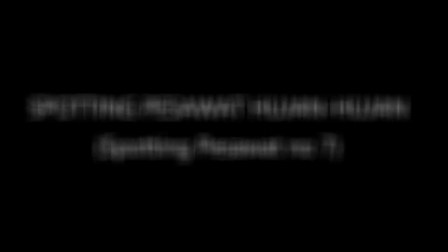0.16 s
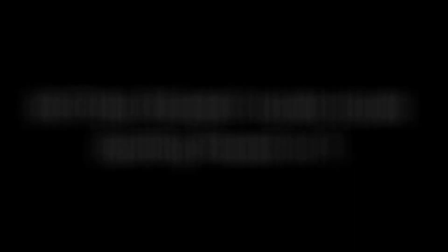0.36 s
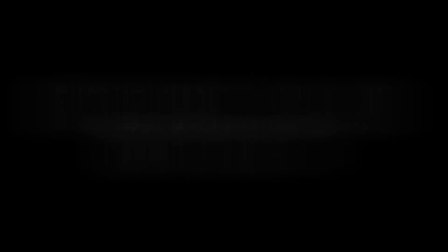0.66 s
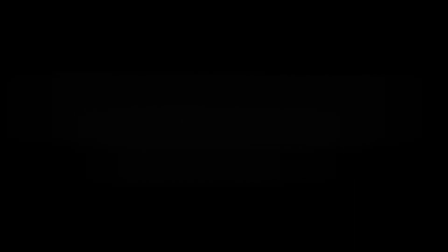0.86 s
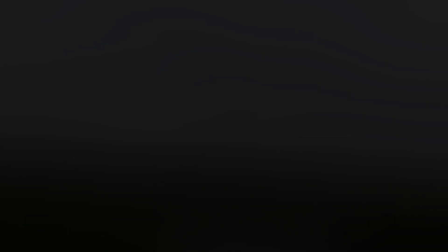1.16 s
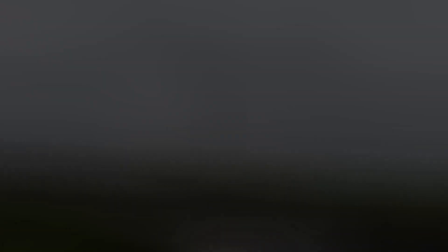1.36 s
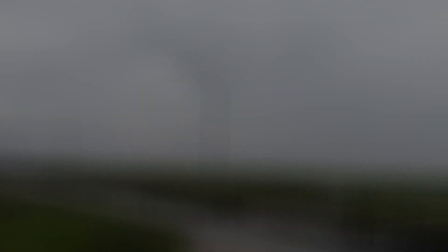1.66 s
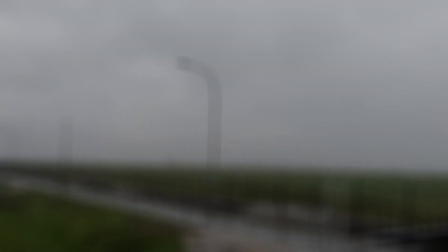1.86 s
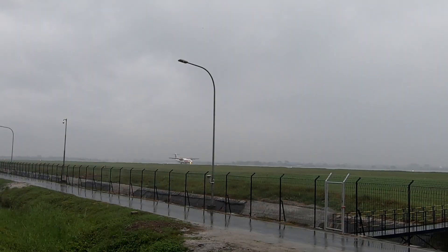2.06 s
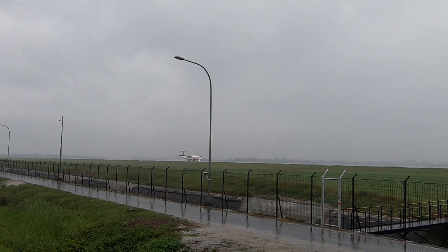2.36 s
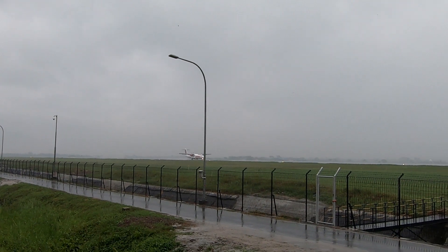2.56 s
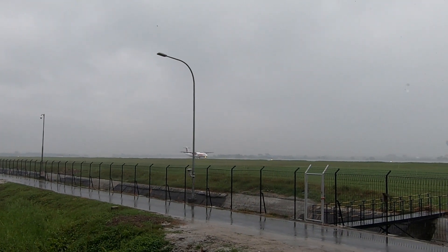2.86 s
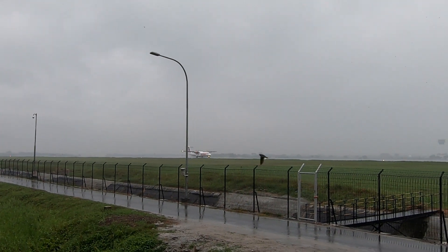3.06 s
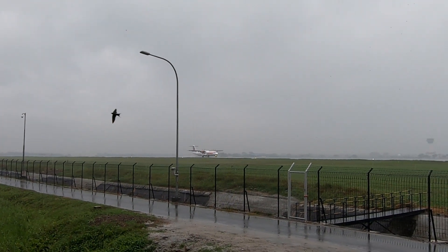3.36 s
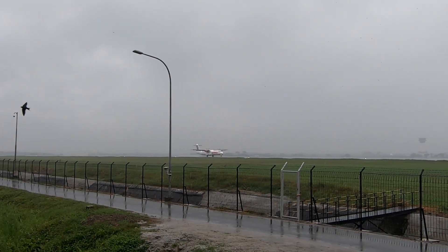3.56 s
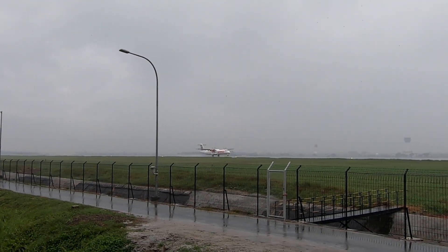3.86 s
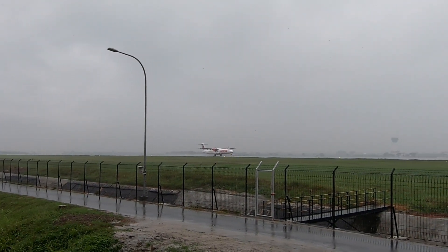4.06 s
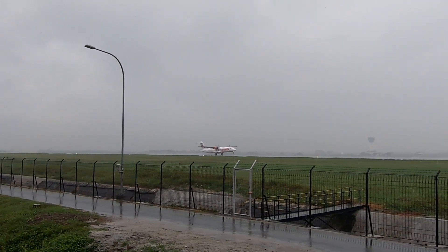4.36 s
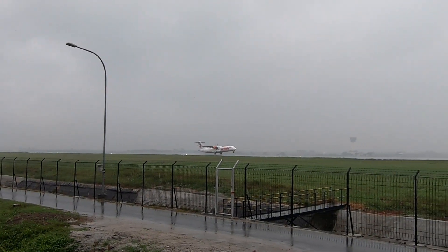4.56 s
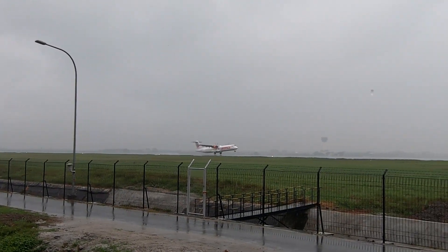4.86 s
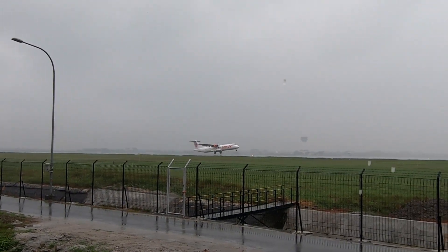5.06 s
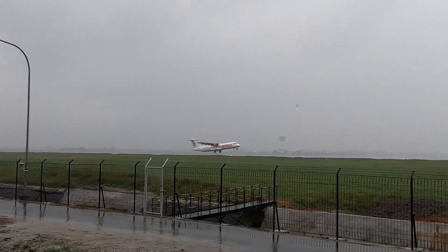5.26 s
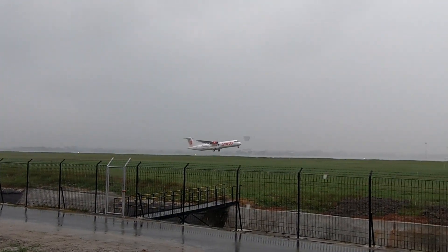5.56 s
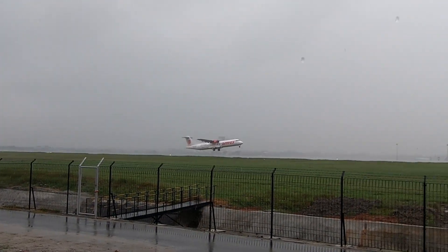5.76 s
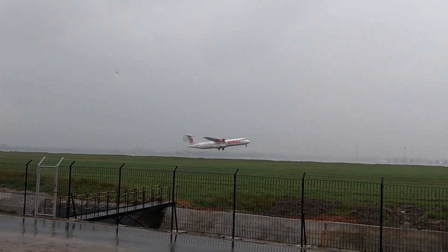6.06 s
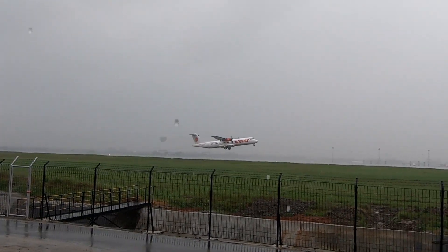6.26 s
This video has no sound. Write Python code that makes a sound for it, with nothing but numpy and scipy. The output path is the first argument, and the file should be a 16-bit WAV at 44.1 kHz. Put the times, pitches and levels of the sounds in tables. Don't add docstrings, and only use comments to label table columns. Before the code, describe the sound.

On a wet, windy airfield, a twin turboprop's low propeller drone swells unevenly, then jet roar, hiss and whine break open as it nears.

```python
import sys
import numpy as np
from scipy import signal
from scipy.fft import rfft, irfft, next_fast_len
from scipy.io import wavfile

SR = 44100
rng = np.random.default_rng(int(sys.argv[2]) if len(sys.argv) > 2 else 0)


def store_pcm(level_fs):
    pcm = np.round(np.clip(level_fs, -1, 1) * 32767).astype(np.int16)
    wavfile.write(sys.argv[1], SR, np.atleast_2d(pcm).T)


def gain_from_db(level_db):
    decades = np.asarray(level_db, float) / 20
    return 10 ** decades


N = 282681
SPEED_M_S, ABEAM_S, OFFSET_M = 58., 7.5, 60.


def rms_one(x):
    return x / np.sqrt(np.mean(x ** 2) + 1e-20)


def in_time(rows):
    s, *columns = np.transpose(rows)
    return [np.interp(np.arange(N) / SR, s, c) for c in columns]


def at_hz(points, hz):
    table_hz, table_db = np.array(points)[:, 0], np.array(points)[:, 1]
    return np.interp(np.log(hz), np.log(table_hz + 1), table_db)


def bumps(rows, width=0.037):
    t = np.arange(N) / SR
    return sum(db * np.exp(-((t - s) / width) ** 2) for s, db in rows)


def swell(start, length, edge):
    u = (np.arange(N) / SR - start) / length
    return np.sin(np.pi / 2 * np.clip(np.minimum(u, 1 - u) / edge, 0, 1)) ** 2


def drift(rate):
    r = np.exp(-80 * np.pi * rate / SR)
    steps = rng.standard_normal(N // 40 + 2002)
    slow = signal.lfilter([1], [1, -2 * r, r * r], steps)[2000:]
    return np.interp(np.arange(N) / 40, np.arange(len(slow)), rms_one(slow))


def shape(x, gain_at):
    size = next_fast_len(N)
    hz = np.arange(1, size // 2 + 2) * SR / size
    return irfft(rfft(x, size) * gain_at(hz), size)[:N]


def high_or_low(x, kind, hz):
    return signal.sosfilt(signal.butter(2, hz, kind, fs=SR, output="sos"), x)


def patchy_noise(spectrum, slow_db, fast_db):
    size = next_fast_len(N)
    hz = np.arange(1, size // 2 + 2) * SR / size
    colour, octaves = gain_from_db(at_hz(spectrum, hz)), np.log2(hz)
    together_db = slow_db * (drift(2.9) + 0.75 * drift(15.0))
    lowest, highest = np.log2(spectrum[0][0]), np.log2(spectrum[-1][0])
    out = 0
    for centre in np.arange(lowest + .5, highest, .5):
        inside = np.flatnonzero(abs(octaves - centre) < .5)
        window = np.cos(np.pi * (octaves[inside] - centre))
        bins = np.zeros(len(hz), complex)
        bins[inside] = [1, 1j] @ rng.standard_normal((2, len(inside))) * window * colour[inside]
        out = out + irfft(bins, size)[:N] * gain_from_db(together_db + fast_db * drift(23.0))
    return rms_one(out)


def tone(hz, wander_hz, flutter_db):
    phase = 2 * np.pi * np.cumsum(hz + wander_hz * drift(10.2)) / SR
    return np.sqrt(2) * np.sin(phase) * gain_from_db(flutter_db * drift(7.2))


def narrow(hz, width_hz):
    a, b = high_or_low(rng.standard_normal((2, N)), "low", width_hz / 2)
    phase = 2 * np.pi * np.cumsum(hz) / SR
    return rms_one(a * np.cos(phase) + b * np.sin(phase))


def ring(clicks, hz, t60):
    r, w = gain_from_db(-60 / (t60 * SR)), 2 * np.pi * hz / SR
    return signal.lfilter([0, np.sin(w)], [1, -2 * r * np.cos(w), r * r], clicks + 1e-18)


def flight():
    ahead = SPEED_M_S * (ABEAM_S - np.arange(N) / SR)
    metres = np.hypot(ahead, OFFSET_M)
    return metres, 1 / (1 - SPEED_M_S / 343 * ahead / metres)


# (time [s], level [dB])
FIELD_LEVEL = [(.3, -48.5), (.55, -48), (.8, -46), (1.0, -44), (1.3, -42.5), (1.55, -42.5), (2.0, -38.5),
               (2.5, -39), (2.85, -38.5), (3.1, -38), (3.5, -40), (3.8, -40), (4.3, -39), (4.7, -42.5),
               (5.2, -42), (5.6, -39.5), (6.41, -42)]
# (frequency [Hz], density [dB per Hz])
WASH_COLOUR = [(180, -36.5), (300, 1.5), (315, -3.5), (360, -2), (424, -4.5), (500, -3), (708, -8),
               (1670, -10.5), (3020, -16.5), (4720, -22), (5760, -30.5), (7880, -34), (12700, -44.5),
               (15500, -60)]
# (time [s], level change [dB])
WIND_GUSTS = [
    (1.28, 2),
    (1.39, 1.5),
    (1.65, 1),
    (2.27, -0.5),
    (2.5, 0.5),
    (2.98, 1),
    (4.2, 1.5),
]
DULL_HZ, DULL_DB, CLEAR_AT_DB = 7500, 1, -42.5


def wash():
    field_db, = in_time(FIELD_LEVEL)
    air = gain_from_db(field_db + 0.5 + bumps(WIND_GUSTS)) * patchy_noise(WASH_COLOUR, slow_db=0.35, fast_db=1.3)
    top = shape(air, lambda hz: 1 / (1 + (DULL_HZ / hz) ** 8))
    return air - top * (1 - gain_from_db(DULL_DB * np.minimum(field_db - CLEAR_AT_DB, 0)))


# (frequency [Hz], density [dB per Hz])
RUMBLE_COLOUR = [(20, -18), (35, -5), (60, -1.5), (90, 2), (120, 4.5), (150, 3), (200, -3.5), (260, -11.5),
                 (400, -41)]
# (time [s], level change [dB])
WIND_HEAVES = [(.35, 7.5), (.75, -7), (1.15, 4.5), (1.5, -3.5), (1.8, 1.5), (2.1, 0), (2.8, 2.5), (3.5, 5),
               (3.85, 2), (4.25, -1.5), (4.8, -2), (5.4, -1), (5.6, -1.5), (5.75, -3), (6.12, -1.5),
               (6.27, -2.5)]
RUMBLE_FOLLOWS, RUMBLE_AT_100_M_DB, RUMBLE_NEARS = 1.51, -21.5, 0.82


def rumble():
    field_db, = in_time(FIELD_LEVEL)
    nearing_db = RUMBLE_NEARS * 20 * np.log10(flight()[0] / 100)
    level_db = RUMBLE_AT_100_M_DB + RUMBLE_FOLLOWS * (field_db + 39.5) - nearing_db
    heave_db = bumps(WIND_HEAVES, width=0.094)
    return gain_from_db(level_db + heave_db) * patchy_noise(RUMBLE_COLOUR, slow_db=-1.23, fast_db=0.95)


# (time [s], pitch [Hz], level [dB])
MOTOR_REVS = [
    [(0.25, 259.8, -44), (.51, 264.6, -49.5), (0.948, 266, -41), (1.06, 271.2, -34.5), (1.3, 266, -36),
     (1.44, 276.7, -34), (1.644, 277.5, -39.5), (1.678, 277.5, -30), (1.734, 282.7, -45), (1.8, 283.7, -39)],
    [(2.66, 265.5, -60), (2.74, 269.8, -38), (2.82, 274, -43.5), (2.9, 277.5, -38), (3.06, 281, -43),
     (3.16, 281.2, -37), (3.33, 279.8, -38.5), (3.4, 277.7, -52.5)],
]


def motor():
    t, out = np.arange(N) / SR, 0
    for rev in MOTOR_REVS:
        hz, level_db = in_time(rev)
        on = np.clip(np.minimum(rev[-1][0] - t, t - rev[0][0] + .1) / 0.026, 0, 1)
        out = out + on * gain_from_db(level_db) * tone(hz, wander_hz=0.8, flutter_db=1.5)
    return out


# (time [s], level [dB])
BLADE_LEVEL = [(.3, -44), (.9, -47), (1.15, -43), (2.0, -43.5), (2.45, -31.5), (2.8, -28), (3.2, -21),
               (3.9, -25.5), (4.35, -21.5), (4.64, -16.5), (5.15, -21.5), (5.27, -40), (5.47, -24),
               (5.65, -30.5), (5.72, -19.5), (5.83, -29), (6.0, -17.5), (6.12, -13), (6.41, -15)]
# (time [s], level change [dB])
BLADE_TWINKLES = [(.28, 5), (.39, 14), (.6, 7), (.7, 4.5), (.88, 12), (1.12, 16.5), (1.2, 6), (1.29, 11.5),
                  (1.42, 10), (1.52, 0.5), (1.65, 11), (1.8, 17), (1.96, 18), (2.06, 7), (2.23, 7),
                  (2.36, -2.5), (2.52, 7.5), (2.61, 6), (2.68, -8), (2.76, -5.5), (2.82, 4.5), (2.855, -7),
                  (2.89, 3), (2.95, -5), (3.0, 2.5), (3.07, -5), (3.14, 6), (3.33, -3), (3.4, 2),
                  (3.46, -5), (3.51, 3), (3.57, -7), (3.63, 1.5), (3.68, -3.5), (3.75, 5), (3.79, -6),
                  (3.85, 2), (3.9, -4), (3.96, 1.5), (4.02, -4), (4.09, 2), (4.17, -7.5), (4.22, 2.5),
                  (4.31, 0.5), (4.88, 1.5), (5.075, -4), (5.17, -2.5)]
# (order [multiple], start [s], length [s], level [dB])
BLADE_OVERTONES = [
    (2, 1.6, 0.34, -52),
    (2, 2.4, 0.136, -40.5),
    (2, 3.47, 0.08, -44),
    (2, 3.62, .2, -40),
    (2, 3.95, 0.13, -43.5),
    (2, 5.9, 0.22, -43),
    (4, 5.44, 0.078, -42.5),
    (4, 6.05, .16, -44),
    (3, 5.93, 0.15, -40.5),
    (3, 6.1, 0.4, -43.5),
]
BLADE_REST_HZ = 116.37
TWINKLE_DB, STEADY_FROM_S, TWINKLE_PER_S = 2, 3.8, 5.4


def overtone_gain(order):
    return sum(gain_from_db(db) * swell(s, length, edge=0.25) for k, s, length, db in BLADE_OVERTONES if k == order)


def propellers():
    hz = BLADE_REST_HZ * flight()[1]
    unsteady = np.clip(1 - np.arange(N) / SR / STEADY_FROM_S, 0, 1)
    twinkle_db = TWINKLE_DB * unsteady * drift(TWINKLE_PER_S) + bumps(BLADE_TWINKLES, width=0.027)
    blade = tone(hz, wander_hz=0.75, flutter_db=-0.34) + gain_from_db(-14) * narrow(hz, width_hz=31.3)
    out = gain_from_db(in_time(BLADE_LEVEL)[0] + twinkle_db) * blade
    out += (overtone_gain(2) + gain_from_db(-62.5)) * tone(2 * hz, wander_hz=2.5, flutter_db=1.5)
    out += overtone_gain(3) * tone(3 * hz, wander_hz=4.84, flutter_db=1.0)
    return out + overtone_gain(4) * tone(4 * hz, wander_hz=5.5, flutter_db=5.0)


# (time [s], peak [dB], brightness [dB per octave])
DROP_HITS = [(0.448, -42, 1), (1.2550, -50, 3), (1.2610, -38, -6), (1.2642, -31, -10), (1.2655, -33, -8),
             (1.2665, -33, -6), (1.2682, -28, -9), (1.2715, -36, -2), (1.2738, -27, -5), (1.2775, -38, -3),
             (1.281, -39, -4), (1.2855, -43, -7), (1.371, -41, -4), (1.383, -40, 1), (1.398, -44, 0),
             (1.402, -42, 0), (1.4052, -35, -1), (1.407, -32, 0), (1.4095, -41, -3)]
# (time [s], peak [dB])
DROP_CRACKS = [
    (.448, -34),
    (1.255, -35),
    (1.2655, -16),
    (1.273, -28),
    (1.277, -30),
    (1.3835, -26),
    (1.4, -30),
    (1.4048, -21),
    (1.408, -29),
]
# (frequency [Hz], level [dB], t60 [s])
HOUSING_MODES = [(1420, 0, 0.0094), (1650, 0, 0.017), (2480, -1, 0.0093), (3450, 3, 0.0037),
                 (4700, 2, 0.006), (6660, 3, 0.0017), (8460, -14, 0.0027), (10500, -17, 0.006)]
# (time [s], peak [dB])
HANDLING_KNOCKS = [
    (1.98, -30.5),
    (2.256, -25.5),
    (4.061, -34),
]


def clicks_at(rows):
    clicks = np.zeros(N)
    clicks[[int(s * SR) for s, db in rows]] = gain_from_db(np.array(rows)[:, 1])
    return clicks


def drops():
    s, peak_db, bright_db = np.transpose(DROP_HITS)
    chance_db = rng.normal(0, 1.5, (len(s), len(HOUSING_MODES)))
    spray = rng.standard_normal((len(HOUSING_MODES), N)) / 6
    out = np.zeros(N)
    for k, (hz, level_db, t60) in enumerate(HOUSING_MODES):
        clicks = np.zeros(N)
        tilt_db = bright_db * np.log2(hz / 2000)
        clicks[(s * SR).astype(int) - 100] = gain_from_db(peak_db + level_db - 8 + tilt_db + chance_db[:, k])
        splat = signal.oaconvolve(clicks, np.hanning(180))[:N] * spray[k]
        out += ring(ring(splat, hz, 0.00085) * 0.46, hz, t60)
    ticks = clicks_at(DROP_CRACKS)
    out += gain_from_db(-19.5) * (ring(ticks, 6800, .004) - ring(ticks, 8900, .003))
    burst = signal.oaconvolve(ticks, np.hanning(70))[:N] * spray[0]
    out += gain_from_db(-4) * shape(burst, lambda hz: np.exp(-(np.log(hz / 6500) / 0.75) ** 2 - (hz / 12000) ** 4))
    knocks = clicks_at(HANDLING_KNOCKS)
    return out + ring(knocks, 258.6, 0.16) + ring(knocks, 352, 0.088) + 0.29 * ring(knocks, 340, 0.039)


# (start
# [s], length [s], centre [Hz], glide [Hz per s], level [dB])
GROWL_BANDS = [
    (3.901, 1.25, 212, 3, -40),
    (5.197, 0.33, 204, -14.5, -33),
    (5.499, .45, 194.6, -14.5, -34),
    (3.872, 0.263, 347.3, -9.5, -40.5),
    (4.402, 0.56, 599, -81, -50),
    (4.3, 0.5, 280, -59.5, -48),
               (5.7, .6, 530, -40, -50), (5.29, .26, 570, -10, -45), (5.3, .3, 760, 0, -50),
               (5.63, .025, 4200, 0, -42), (2.96, .06, 3200, 3000, -55), (2.47, .07, 1500, 0, -48),
               (1.62, .08, 950, 0, -50), (1.26, .22, 6650, 600, -66), (1.44, .32, 6850, 900, -67),
               (1.26, .12, 8100, -600, -64), (1.4, .2, 7800, -300, -69), (1.26, .1, 10300, 1500, -72),
               (1.36, .4, 10500, 800, -74), (5.06, .14, 4300, -300, -56), (5.77, .12, 2900, -600, -41),
               (5.86, .12, 2400, 1500, -41), (6.0, .1, 3100, -2500, -40), (5.9, .2, 1600, 0, -43),
               (6.28, .1, 3100, 0, -45), (6.33, .08, 1900, 0, -45), (2.93, .1, 2900, 5000, -54),
               (2.42, .15, 2100, 0, -52)]


def growls():
    t, out = np.arange(N) / SR, 0
    for s, length, hz, glide, db in GROWL_BANDS:
        hump = narrow(hz + glide * (t - s), width_hz=20 + 0.093 * min(hz, 9000))
        out = out + gain_from_db(db) * swell(s, length, edge=0.12) * hump
    return out


# (time [s], level [dB])
OPEN_VIEW = [(.3, -101), (3.1, -86), (3.4, -77), (3.7, -56.5), (4.0, -54), (4.3, -48.5), (4.7, -48.5),
             (5.1, -45.5), (5.4, -46.5), (5.5, -40), (5.57, -39), (5.63, -36), (5.72, -32.5), (5.85, -31.5),
             (5.95, -31.5), (6.1, -31.5), (6.22, -34.5), (6.33, -31), (6.41, -32.5)]
# (frequency [Hz], density [dB per Hz])
ROAR_COLOUR = [(300, 3), (500, -2), (900, -4.5), (1600, -5), (1900, -6.5), (2600, -4), (3800, -5.5),
               (5000, -11), (6500, -24)]
# (frequency [Hz], density [dB per Hz])
HISS_COLOUR = [(4000, -15), (5200, -5.5), (6500, -2.5), (8000, -5), (9000, -8), (10200, -12.5),
               (10900, -34.5), (13200, -37), (13700, -29), (14500, -24.5), (15200, -38), (15600, -59)]
# (time [s], level change [dB])
JET_SPITS = [
    (5.618, 3),
    (5.642, 3),
    (5.666, 2.5),
    (5.718, 2.5),
    (5.89, 1),
    (5.97, 1.5),
    (6.025, 1),
    (6.065, 2),
    (6.2, -2),
]
# (time [s], level change [dB])
HISS_FLARES = [
    (5.62, 3.5),
    (5.68, 4),
    (6.0, 3),
    (6.27, 7.5),
]
# (time [s], level change [dB])
WHINE_GLINTS = [
    (5.35, 3),
    (5.59, 0),
    (5.68, -6),
    (5.8, -2),
    (6.0, 5.5),
    (6.12, 2),
    (6.19, 4),
    (6.26, 5),
]
WHINE_REST_HZ = 6530
HISS_DB, HISS_FOLLOWS, WHINE_DB, WHINE_FOLLOWS = -39.5, 0.83, -41, 1.3
CRACKLE_DB, CRACKLE_PER_S = .7, 70.
EXHAUST_HZ, EXHAUST_DB_PER_S, EXHAUST_EVEN_S = 1550, 9, 6.1


def engines():
    view_db, hz = in_time(OPEN_VIEW)[0], WHINE_REST_HZ * flight()[1]
    near_whine = gain_from_db(WHINE_DB + WHINE_FOLLOWS * (view_db + 31.0) + bumps(WHINE_GLINTS))
    far_whine = gain_from_db(-70 + 1.6 * (in_time(FIELD_LEVEL)[0] + 40.0))
    band = narrow(hz + 120 * drift(3.0), width_hz=650)
    line = gain_from_db(-9 + 3 * drift(12)) * narrow(1.02 * hz + 50 * drift(6), width_hz=70)
    spit_db = bumps(JET_SPITS, width=.009) + CRACKLE_DB * drift(CRACKLE_PER_S)
    roar = gain_from_db(view_db + spit_db) * patchy_noise(ROAR_COLOUR, slow_db=0.01, fast_db=1.0)
    turn_db = EXHAUST_DB_PER_S * np.maximum(np.arange(N) / SR - EXHAUST_EVEN_S, -.8)
    low, high = high_or_low(roar, "low", EXHAUST_HZ), high_or_low(roar, "high", EXHAUST_HZ)
    roar = low * gain_from_db(turn_db) - high * gain_from_db(-turn_db / 5)
    hiss_db = HISS_DB + HISS_FOLLOWS * (view_db + 31.5) + bumps(HISS_FLARES)
    hiss = gain_from_db(hiss_db) * patchy_noise(HISS_COLOUR, slow_db=0.4, fast_db=1.5)
    return roar + hiss + (near_whine + far_whine) * (band + line)


# (time [s], top pitch [Hz], level [dB], lead-in sweep [dB], pitch crests after [s])
BIRD_BUZZES = [
    (4.998, 7280, -40.5, -9, .048),
    (5.208, 7150, -39.5, -18, .022),
    (5.4, 7050, -38.5, -18, .05),
    (5.598, 7250, -35, -14, .055),
    (5.805, 7300, -36.5, -20, .04),
    (5.975, 7220, -37, -20, .03),
]
BUZZ_S, BUZZ_FROM, BUZZ_SAG = 0.115, 0.6, .94


def bird():
    t, hz, gain = np.arange(N) / SR, np.full(N, 7000.), np.zeros(N)
    for s, top_hz, level_db, lead_db, crest_s in BIRD_BUZZES:
        on = (t > s) & (t < s + BUZZ_S)
        u = t[on] - s
        hz[on] = top_hz * np.interp(u, [0, .016, crest_s, BUZZ_S], [BUZZ_FROM, .96, 1, BUZZ_SAG])
        knots_s = [0, .011, .02, 0.41 * BUZZ_S, 0.82 * BUZZ_S, BUZZ_S]
        gain[on] = gain_from_db(level_db) * np.interp(u, knots_s, [0.03, gain_from_db(lead_db), 0.62, 0.66, .58, 0.1])
    warble = np.sin(2 * np.pi * np.cumsum(290 + 70 * drift(60)) / SR)
    pitch = hz + 400 * warble + 170 * drift(45)
    voice = np.sqrt(2) * np.sin(2 * np.pi * np.cumsum(pitch) / SR) * gain_from_db(3.5 * drift(120))
    return gain * (1 + 0.3 * warble) * (voice * 0.95 + 0.6 * narrow(hz, width_hz=900))


# (frequency [Hz], side minus mid [dB])
SIDE_WIDTH = [(60, -33), (140, -40), (330, -32), (500, -24), (770, -9), (1200, -4), (2000, -6),
              (2900, -5.5), (3600, -11), (4300, -5.5), (5200, -1), (6500, 1.5), (8000, 6), (10000, 2.5),
              (15000, 0)]
# (frequency [Hz], left minus right [dB])
SIDE_LEAN = [(60, 0.5), (110, 4), (200, -1.5), (380, -1), (700, 2), (1290, 2), (2380, 2), (4400, 0.5),
             (8120, -2), (15000, 1)]
QUADRATURE = .45


def spread(mid):
    def size(hz):
        return gain_from_db(at_hz(SIDE_WIDTH, hz))

    def share(hz):
        ratio = np.tanh(at_hz(SIDE_LEAN, hz) * np.log(10) / 20)
        return np.clip(ratio * (1 + size(hz) ** 2) / (2 * size(hz)), -.95, .95)

    def rest(hz):
        return size(hz) * np.sqrt(1 - share(hz) ** 2)

    cells = signal.stft(mid, nperseg=256)[2]
    random_turn = np.exp(2j * np.pi * rng.random(cells.shape))
    scrambled = np.sqrt(2) * signal.istft(cells * random_turn, nperseg=256)[1][:N]
    leaning = shape(mid, lambda hz: size(hz) * share(hz) + 1j * QUADRATURE * rest(hz))
    return leaning + np.sqrt(1 - QUADRATURE ** 2) * shape(scrambled, rest)


# (start [s], length [s])
EARLY_WIDENINGS = [(.35, .03), (.47, .08), (.9, .03), (1.0, .04), (1.2, .05), (1.33, .4), (1.95, .05),
                   (2.32, .03), (2.39, .05), (2.58, .2), (2.92, .03), (3.15, .06)]
EARLY_WIDTH_DB = -17
OPENS_S, OPENS_OVER_S, OPEN_DB = 3.21, 1, -2.5


def image_width():
    leak = gain_from_db(EARLY_WIDTH_DB) * sum(swell(s, length, edge=0.28) for s, length in EARLY_WIDENINGS)
    opening = np.tanh(np.maximum(np.arange(N) / SR - OPENS_S, .001) / OPENS_OVER_S)
    return gain_from_db(OPEN_DB) * (leak + opening)


def capsules():
    level_db = -68.0 + 2.5 * np.minimum(in_time(FIELD_LEVEL)[0] + 40.5, 0)
    hiss = shape(rng.standard_normal(N), lambda hz: np.exp(-((hz - 12800) / 1500) ** 2))
    return gain_from_db(level_db) * hiss


def scene():
    mid = rumble() + wash() + propellers() + motor() + growls() + engines() + bird() + drops()
    end_fade = np.clip(np.arange(N)[::-1] / 400, 0, 1)
    side = spread(mid * end_fade) * image_width() + capsules()
    return np.array([mid + side, mid - side])


# (frequency [Hz], level below the whole [dB])
HOLE_LEVEL = [(2700, -42), (9000, -44), (11000, -43), (12800, -45), (13600, -52), (15000, -58),
              (16000, -50)]


def holes(x):
    cells = signal.stft(np.array([x[0] + x[1], x[0] - x[1]]) / 2, nperseg=1024)[2]
    power = (abs(cells[:, :512]) ** 2).reshape(2, 32, 16, -1).sum(axis=2)
    band_hz = (np.arange(32)[:, None] + .5) * SR / 64
    under_db = at_hz(HOLE_LEVEL, band_hz) + rng.normal(0, 2.2, power.shape)
    whole = power[:, 1:].sum(axis=(0, 1))
    keep = (power > gain_from_db(2 * under_db) * whole) | (band_hz < 2700)
    cells[:, :512] *= np.repeat(keep, 16, axis=1)
    mid, side = signal.istft(cells, nperseg=1024)[1][:, :N]
    return np.array([mid + side, mid - side])


TOP = .85
FADE_S, FADE_OVER_S = .18, 0.083


def top_cut(x):
    return signal.sosfilt(signal.butter(12, 15950, fs=SR, output="sos"), x)


def record(dry):
    camera = holes(TOP * np.tanh(dry / TOP))
    fade_in = np.clip((np.arange(N) / SR - FADE_S) / FADE_OVER_S, 0, 1) ** 2
    fade_out = np.clip(np.arange(N)[::-1] / 60 + 0.33, 0, 1)
    return top_cut(camera * fade_in * fade_out)


dry = scene()
out = record(dry)
store_pcm(out)
```